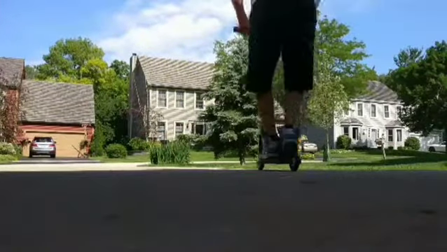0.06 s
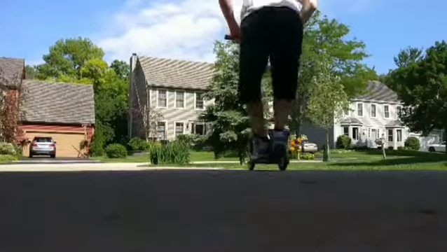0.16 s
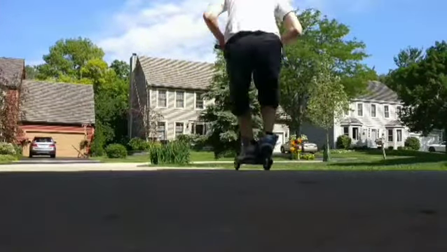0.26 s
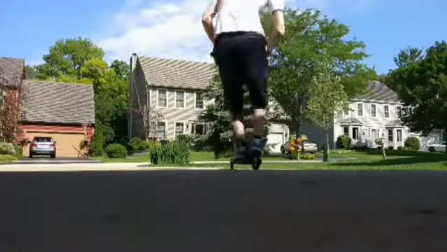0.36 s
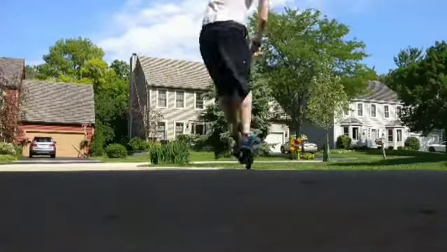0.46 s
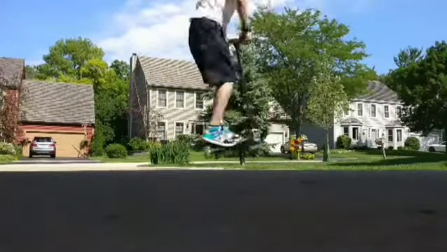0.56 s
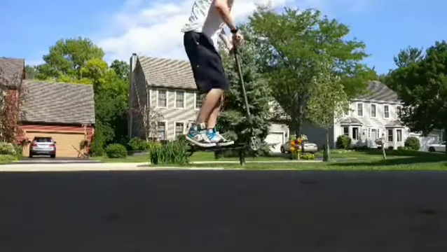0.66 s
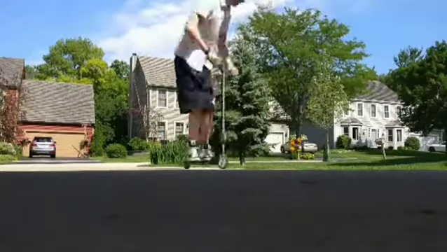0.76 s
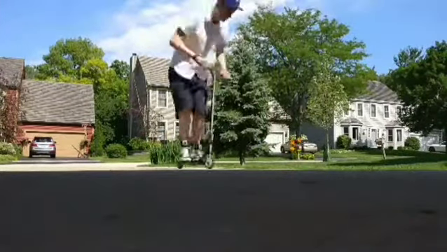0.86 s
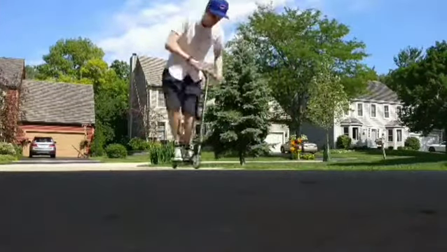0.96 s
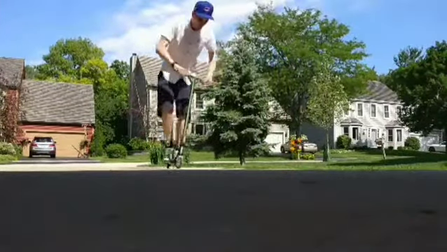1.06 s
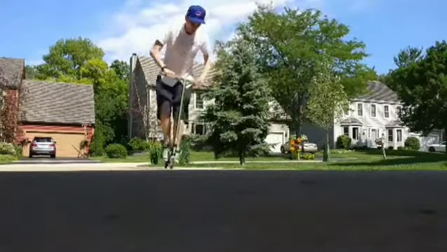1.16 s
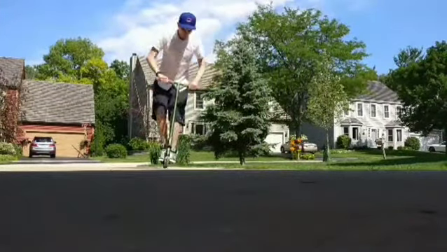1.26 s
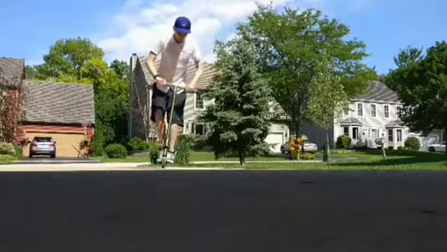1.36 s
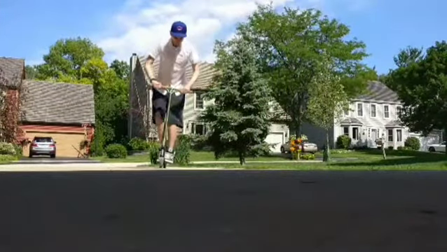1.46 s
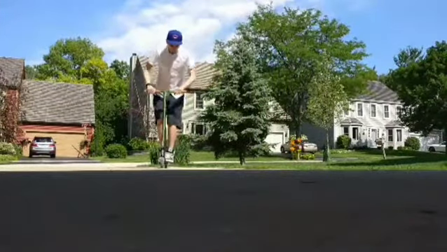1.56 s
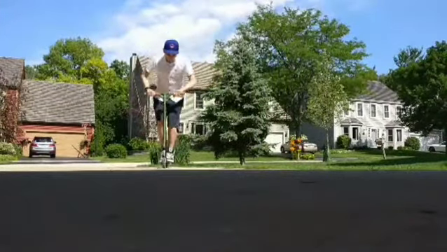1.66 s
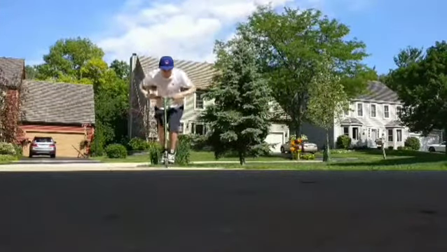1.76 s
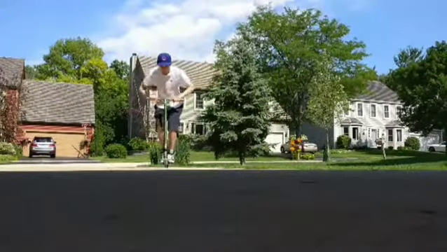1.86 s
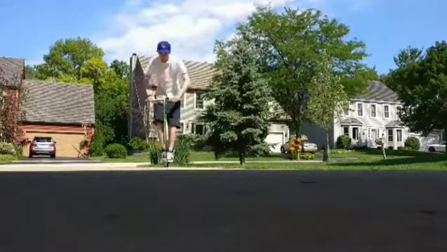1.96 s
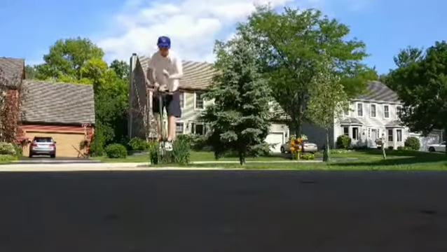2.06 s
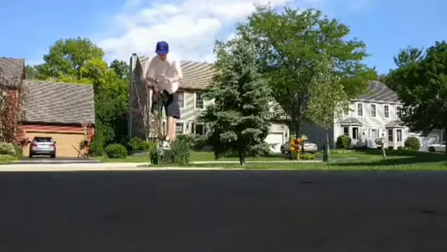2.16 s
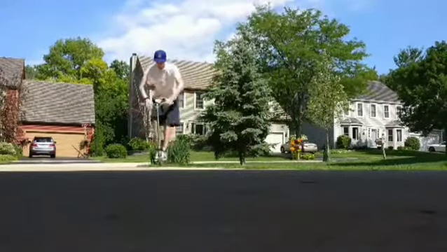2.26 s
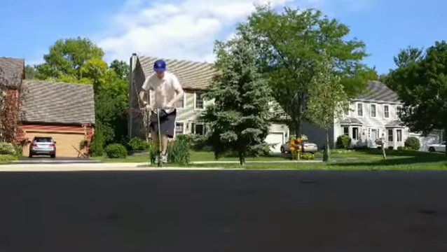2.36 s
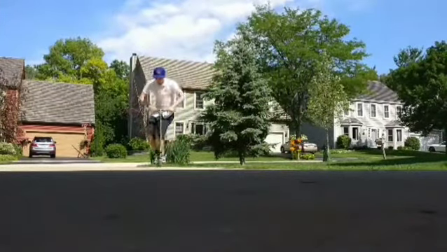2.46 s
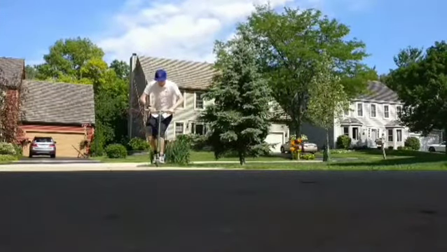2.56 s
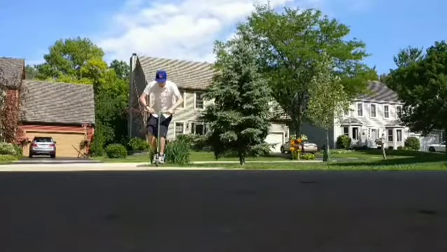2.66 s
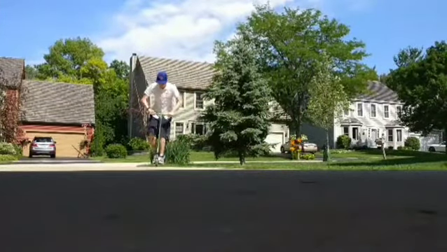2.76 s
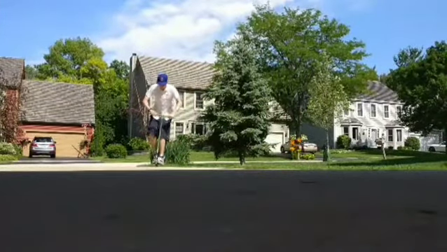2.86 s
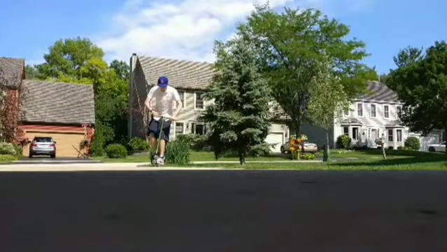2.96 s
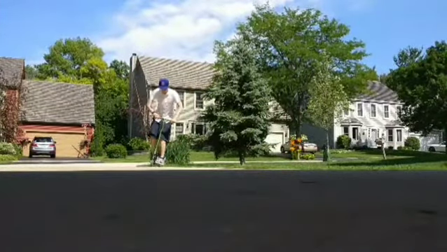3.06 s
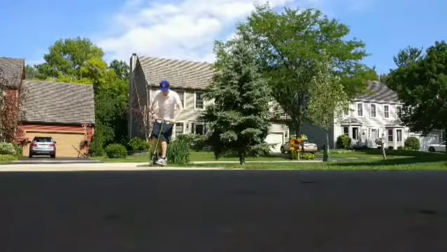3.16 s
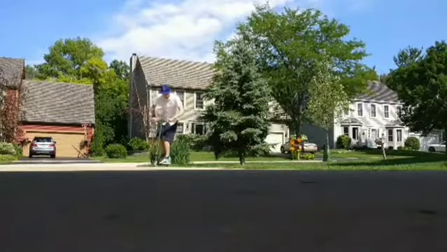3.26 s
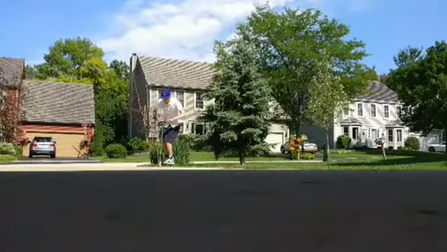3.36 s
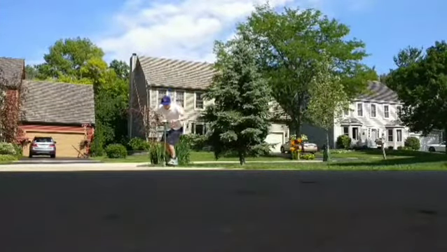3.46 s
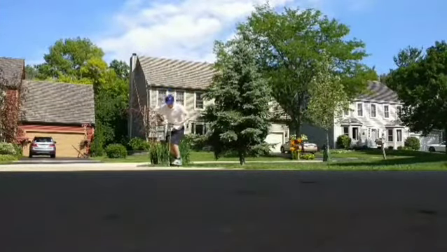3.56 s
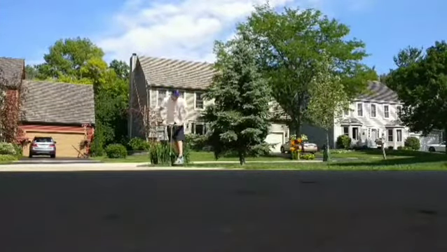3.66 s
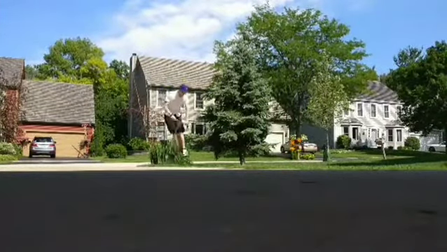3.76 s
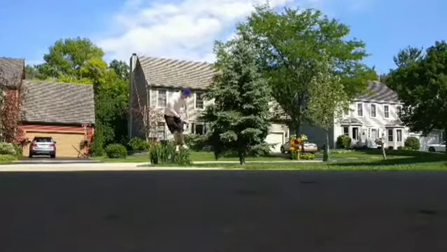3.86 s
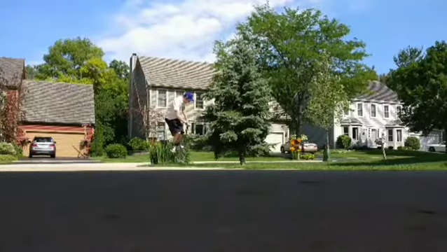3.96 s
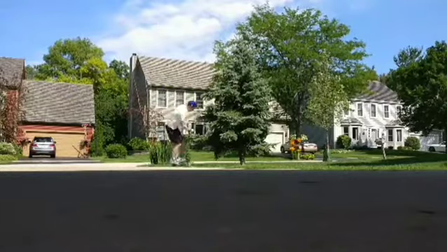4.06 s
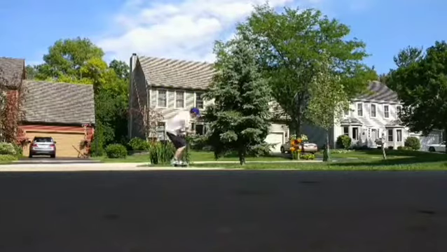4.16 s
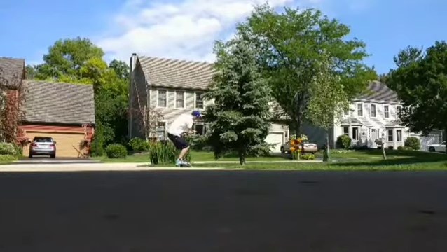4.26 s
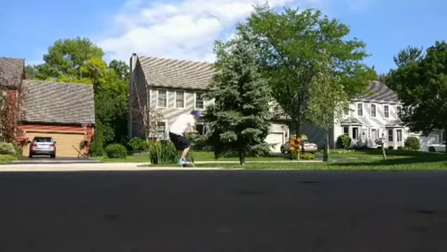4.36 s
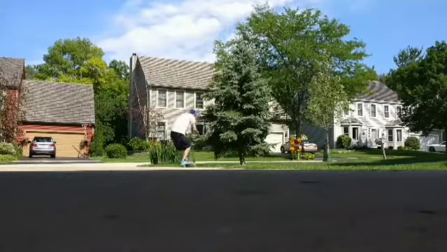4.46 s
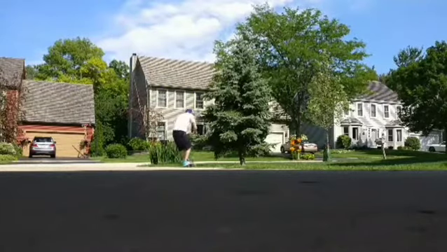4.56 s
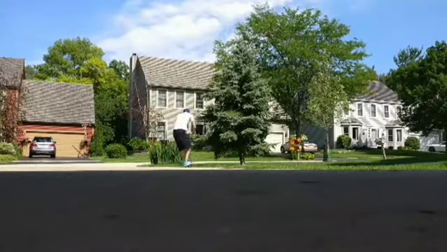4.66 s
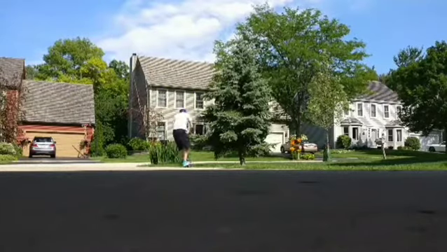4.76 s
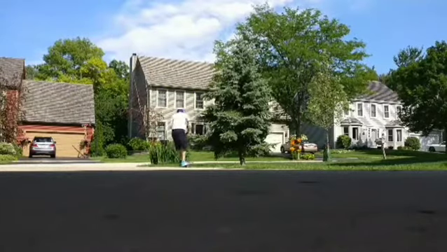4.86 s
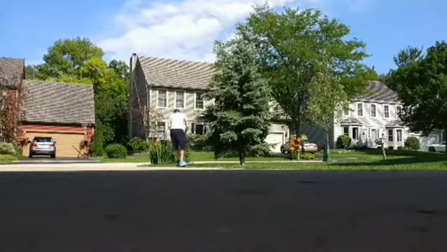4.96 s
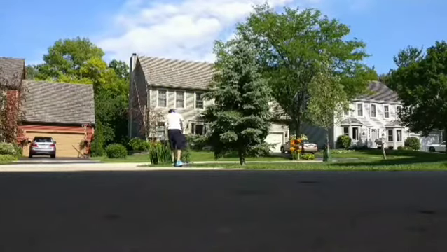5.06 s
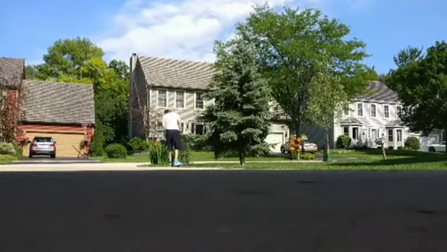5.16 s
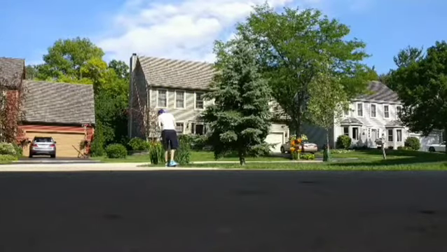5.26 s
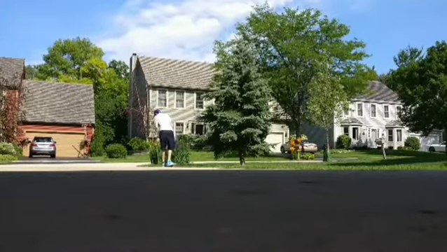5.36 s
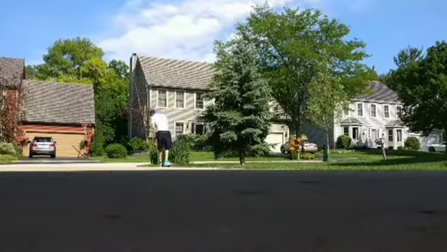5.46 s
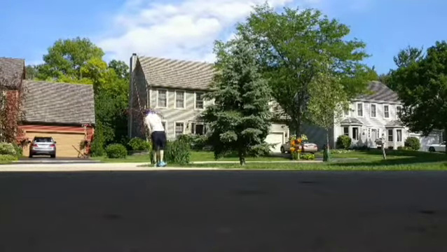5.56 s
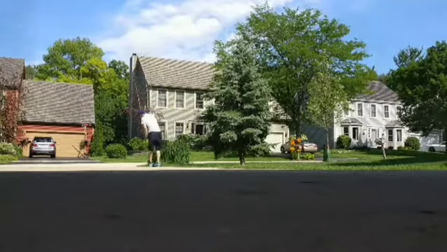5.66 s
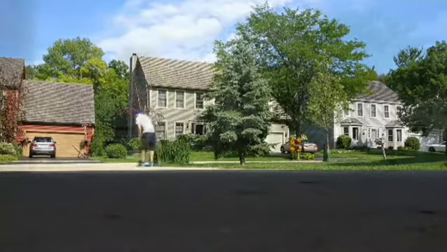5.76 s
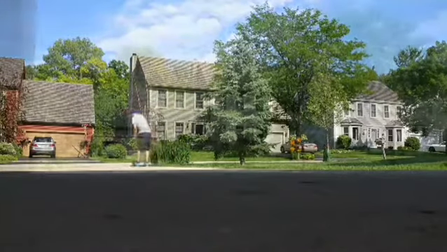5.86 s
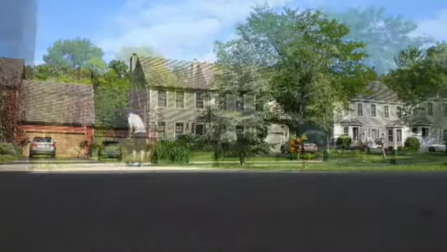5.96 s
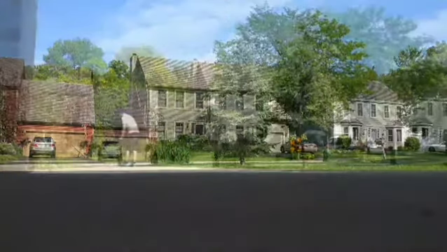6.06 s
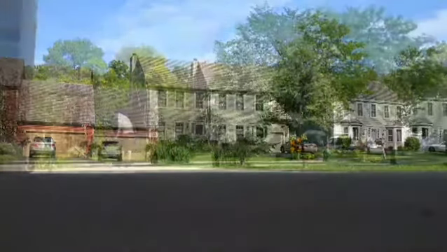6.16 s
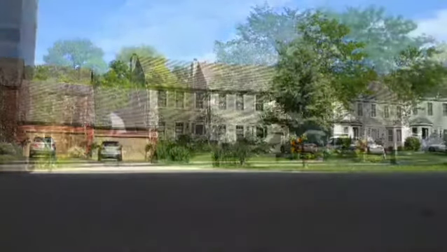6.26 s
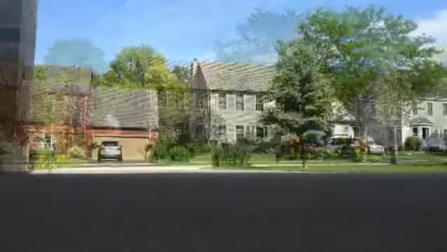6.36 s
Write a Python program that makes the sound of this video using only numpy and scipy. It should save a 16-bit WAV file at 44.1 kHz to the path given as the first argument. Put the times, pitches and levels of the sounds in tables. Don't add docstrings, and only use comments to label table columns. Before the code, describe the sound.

On a quiet residential street, a scooter wheel scrubs and squeals briefly, then the metal deck slams onto asphalt with a ringing, rattling clack. Small clamp knocks and shoe brushes follow, then two more landings, each echoing off house fronts. Distant traffic rumbles low beneath faint bird chirps. Everything fades out, then a closer landing cracks in abruptly. Outdoor stereo pickup, fixed near the ground.

```python
import sys
import numpy as np
from scipy import signal
from scipy.fft import rfft, irfft
from scipy.io import wavfile
from scipy.ndimage import uniform_filter1d

SR = 44100
rng = np.random.default_rng(int(sys.argv[2]) if len(sys.argv) > 2 else 0)


def master(y):
    cut = np.clip(np.atleast_2d(y).T, -1, 1)
    pcm = np.round(cut * 32767)
    wavfile.write(sys.argv[1], SR, pcm.astype(np.int16))


def attenuation_scalar(level_db):
    decades = np.asarray(level_db, float) / 20
    return 10 ** decades


N = 282681

# start_s, level_db
TRAFFIC_SWELL = [(0.0, 1), (0.3, 1), (0.6, -0.5), (1.0, -0.5), (1.45, -1.5), (1.95, -0.2), (2.2, -1.5),
                 (2.55, 0.5), (3.0, -0.5), (3.6, 1.1), (4.05, 1.1), (4.4, 4), (5.3, 2.06), (6.13, 1.5),
                 (6.41, 7.5)]
# freq_hz, level_db (per Hz)
RUMBLE_COLOUR = [(12, -70.5), (20, -36), (29, -7.5), (45, -6.5), (97, 2), (177, -7.5), (248, -11.5),
                 (312, -13.5), (403, -31.5), (500, -28.5), (650, -51.5), (1100, -120)]
# freq_hz, level_db (per Hz)
ROLL_COLOUR = [(210, -31), (350, -7), (409, -10.5), (442, -0.5), (528, -5), (667, 2), (942, -4.5),
               (1520, -1.5), (3910, -16), (5000, -23.5), (6500, -44.5), (11000, -120)]
# freq_hz, level_db (per Hz)
GRIT_COLOUR = [(2350, -19), (4000, -5.5), (4640, -6.5), (5410, -5), (7630, -13.5), (10400, -13),
               (11800, -7), (14700, -8.5), (15700, -13.5), (16200, -40.5), (16500, -60)]
# freq_hz, likeness (-1 to 1)
STEREO_LIKENESS = [(60, 1), (130, 0.91), (290, 0.98), (640, 0.22), (1410, -0.096), (3100, 0.093),
                   (6820, -0.19), (15000, -0.15)]
# start_s, length_s, start_hz, end_hz, level_db
BIRD_CALLS = [(1.636, 0.044, 3600, 4050, -58), (1.785, 0.31, 4150, 4330, -63),
              (2.012, 0.029, 12400, 12600, -60), (2.04, 0.032, 12360, 12150, -53),
              (2.063, 0.02, 13500, 13500, -57), (2.917, 0.046, 4220, 3060, -58),
              (3.032, 0.053, 3800, 3720, -56), (3.057, 0.038, 3400, 2493, -56.5),
              (3.151, 0.048, 4200, 3010, -56), (5.416, 0.034, 3930, 2740, -58),
              (5.83, 0.059, 4330, 4250, -55.5), (5.959, 0.068, 4300, 4320, -51)]
# start_s, length_s, level_db, top_hz
BRUSHES = [
    (0.341, 0.11, -42, 5650),
    (1.867, 0.3, -55, 6600),
    (2.544, 0.061, -40.5, 6370),
    (3.577, 0.26, -64, 9000),
]
# start_s, pressure_db
PIVOT_PRESSURE = [(0.0, -53.5), (0.088, -57), (0.226, -40.5), (0.292, -41), (0.345, -49.5), (0.396, -44),
                  (0.43, -54), (0.484, -50.5), (0.66, -52.5)]
# freq_hz, width_hz, level_db, follow_db (per dB of pressure)
WHEEL_MODES = [(638, 16, 3.5, 0.6), (1270, 34, -5, 0.5), (2050, 37, -3, 1.2), (2320, 27, -15, 1.1),
               (2530, 45, 0.5, 2), (2628, 26, -4, 0.4), (3225, 44, -3.5, 1.2), (3600, 56, -16, 1.1)]
# start_s, level_db, pitch_hz, t60_s
WEIGHT_DROPS = [(0.197, -18, 85.6, 0.13), (0.235, -20.5, 51.6, 0.094), (0.6715, -13, 96.6, 0.18),
                (.671, -23, 346, 0.096), (0.719, -21, 193, 0.085), (.734, -21, 200, 0.12),
                (1.103, -25.5, 76, 0.13), (2.236, -25, 96, 0.068), (2.24, -28, 327.4, 0.14),
                (2.273, -25.5, 71.4, 0.16), (3.991, -21, 289, 0.1), (6.231, -11.5, 75, 0.36)]
# start_s, level_db, pitch_hz, hiss_db (relative), t60_s
CLAMP_KNOCKS = [(0.312, -22.5, 2133, -37, 0.07), (0.311, -34.5, 1450, -32, 0.054),
                (0.347, -27.5, 1390, -17, 0.075), (1.4803, -35.5, 1310, -21, 0.071),
                (1.8844, -39, 1140, -18, 0.047), (2.0394, -52.5, 1130, -12, 0.043),
                (2.432, -30, 1390, -19.5, 0.26), (0.961, -33.5, 1950, -28, 0.1),
                (2.55, -29.5, 2290, -17.5, 0.12), (2.565, -26, 2250, -21, 0.094),
                (2.598, -35, 3400, -12.5, 0.072), (2.759, -26, 1340, -27.5, 0.047),
                (2.906, -36.5, 1340, -24, 0.12), (3.6124, -39.5, 1960, -20.5, 0.26),
                (4.523, -36.5, 1950, -24, 0.12), (5.06, -43, 1180, -22, 0.053)]
# freq_hz, level_db (per Hz)
SAND_COLOUR = [(1500, -26), (3000, 1), (5000, -2), (6500, -4), (8000, -20.5), (11000, -18), (13500, -11.5),
               (16000, -29.5)]
# start_s, level_db, pitch_hz, pan_db (left minus right)
METAL_TICKS = [(0.6686, -24.5, 11260, -8.5), (1.878, -60, 8800, -2), (1.937, -53, 7500, -6),
               (2.044, -52, 7500, -4), (2.154, -27, 6500, 2), (2.2331, -20, 7000, -2.5),
               (2.2453, -15, 6910, -5.5), (2.55, -50, 5100, 0), (3.994, -24, 12500, -11),
               (6.2312, -9.5, 9100, -10)]
# freq_hz, width_hz, level_db
DECK_MODES = [
    [(635, 32, -10), (780, 35, 1.5), (886, 65, -14), (1200, 47, -7), (1500, 52, -4.5), (1900, 41, -4.5),
     (1974, 35, -1), (2160, 60, -12), (2482, 57, -5), (2595, 70, -12.5), (3170, 96, -16), (4250, 60, -18),
     (4950, 140, -18)],
    [(840, 75, -10.5), (1190, 130, -7.5), (1500, 120, -9), (1960, 26.6, 1), (2232, 34, -10.5),
     (2370, 45, -16), (2493, 50, -11.5), (3200, 400, -31), (4250, 90, -16.5), (5650, 200, -19.5)],
    [(623, 25, -0.5), (776, 57, -7), (853, 46, -7.5), (1170, 28, -5.5), (1490, 60, -7.5), (1874, 50, -5.5),
     (1984, 76, -1), (2248, 45, -0.5), (2400, 30, -13), (2700, 50, -5.5), (3010, 69, -19), (4160, 74, -20)],
    [(620, 34, -10), (877, 30, -0.5), (1140, 45, -10.5), (1450, 60, 3), (1927, 40, 0.5), (2145, 59, 1.5),
     (2380, 42, -1.5), (2500, 53, -9), (3000, 130, -11.5), (4950, 200, -11.5)],
]
# freq_hz, level_db (per Hz)
CRACK_COLOUR = [(1500, -32.5), (3000, -1.5), (4500, 0.5), (6300, -0.5), (8000, -10), (10000, -8),
                (13500, -4), (15500, -13.5), (16500, -22.5)]
# freq_hz, level_db (per Hz)
CLATTER_COLOUR = [(150, -5.5), (300, 7), (500, -4.5), (800, -3), (1400, -0.5), (2150, -2), (3000, -7.5),
                  (4000, -13), (6000, -46)]
# rumble_db, roll_db, grit_db
LANDING_SETTINGS = [
    (-18, 0.031, 2, 2.1, 6),
    (-18.5, 0.048, 9.2, 16, 0.84),
    (-18, 0.05, 3.5, 2.9, 18),
    (-24, 0.024, 3, 11.5, 25),
]
# start_s, ring_db, crack_db (relative), pan_db (left minus right),
# favoured_hz
FIRST_BLOWS = [(.6695, -2.5, -16.5, 2, 2450), (.6745, -14.5, -20.5, 0, 2100), (.681, -5, -17, 3.5, 2000),
               (.687, -14, -10.5, -6, 1900), (.705, -24.5, -8, -6.5, 2300), (.72, -30, -8, -1, 2500),
               (.73, -32, -13, 0, 2000), (.741, -29, -11, 0, 4900), (.755, -38, -20, -1, 2450),
               (.795, -45, -29, -3, 1500), (.885, -38, -20, 8, 4250), (.886, -39, -20, 0, 1450)]
SECOND_BLOWS = [(2.1526, -21.5, -12, -3.5, 2000), (2.158, -19, -20, -8.5, 1960),
                (2.166, -14.5, -24, 3.5, 1960), (2.178, -16.5, -13, -0.5, 5750),
                (2.19, -13.5, -17.5, 0, 1900), (2.212, -22, -6.5, 8, 5600), (2.2332, -6, -15.5, -2, 2320),
                (2.237, -18.5, -15.5, -1, 1500), (2.2455, -16.5, -8.5, -3.5, 2034),
                (2.2575, -14.5, -14.5, 6.5, 2200), (2.272, -26.5, -11, -0.5, 4250),
                (2.29, -22.5, -22.5, 6.5, 2440), (2.31, -28.5, -18, -7.5, 2500)]
THIRD_BLOWS = [(3.9768, -15.5, -30, 0.5, 1900), (3.9845, -18, -28, -0.5, 1900),
               (3.992, -7, -13, -0.5, 1890), (4.0154, -21.5, -7.5, -4, 2300), (4.04, -20.5, -11, -4, 2050),
               (4.0625, -19, -10.5, 4, 1490), (4.09, -25.5, -12, 2.5, 2170),
               (4.116, -28.5, -16.5, -4, 2280), (4.146, -31, -14, 0, 2250), (4.168, -32, -7, 5, 860)]
FOURTH_BLOWS = [(6.162, -32.5, -3, 5, 2080), (6.169, -28, -16, 4, 2050), (6.174, -20.5, -8.5, 2, 2020),
                (6.175, -14.5, -23, 3, 4950), (6.188, -40, -21, -2, 2050), (6.212, -31, -10, -8, 2200),
                (6.2163, -25, -23, -9, 2050), (6.2325, -4.5, -8.5, 8.5, 1450),
                (6.239, -5.5, -11.5, -3.5, 1900), (6.29, -24, -20, -2, 2150), (6.352, -28, -16, 2, 2150),
                (6.378, -37, -14, -5, 2210)]
# freq_hz, t60_s
HOUSE_DECAY = [(150, 0.46), (700, 0.56), (2000, 0.53), (5000, 0.59), (13000, 0.323)]
# freq_hz, balance_db (left minus right)
PORT_BALANCE = [(60, -2.5), (110, -3), (200, 0.5), (380, -0.5), (700, -1.5), (1290, 1.5), (2380, -1.5),
                (4400, 2.5), (8120, -1), (15000, -10.5)]

LANDING_BLOWS = (FIRST_BLOWS, SECOND_BLOWS, THIRD_BLOWS, FOURTH_BLOWS)
RUMBLE_DB, ROLL_DB, GRIT_DB = -40, -52.5, -67.5
RUMBLE_FOLLOWS, ROLL_FOLLOWS, GRIT_FOLLOWS = 0.94, 1.09, 0.24
SETTLE_PEAK_S = 0.11
SCRUB_HISS_DB, SCRUB_SLOPE = -54, 1.1
LIGHT_RATTLE = 0.06
STRUCK_WIDTH_HZ, ELSEWHERE_DB = 930, -6
WOBBLE_HZ = 26
FADE_FROM_S, FADE_BEND, SINK_DB_PER_S = 5.19, 0.92, -39
CUT_S, OPEN_S = 6.1265, 0.003
EDGE_HZ, LAST_HZ = 15450, 16600


def evened(x):
    return x / np.sqrt(np.mean(x ** 2) + 1e-20)


def read(points, hz):
    f, value = np.transpose(points)
    return np.interp(np.log(hz + 1), np.log(f + 1), value)


def curve(rows, col):
    rows = np.asarray(rows)
    return np.interp(np.arange(N) / SR, rows[:, 0], rows[:, col])


def add(mix, s, sound):
    part = mix[:, round(s * SR):][:, :sound.shape[-1]]
    part += sound[..., :part.shape[1]]


def panned(db):
    return attenuation_scalar([[db / 2], [-db / 2]])


def ring(x, hz, width):
    pole = np.exp((2j * np.pi * hz - np.pi * abs(width)) / SR)
    return signal.lfilter([1], [1, -pole], x)


def hiss(shape, patchy_db, flicker_db):
    frames, hz = N // 256 + 5, np.fft.rfftfreq(1024, 1 / SR)
    a, b, c, d, patches = rng.standard_normal((frames, 513, 5)).T
    patches = uniform_filter1d(patches, size=10, axis=0)
    patches = evened(uniform_filter1d(patches, size=12, axis=1))
    flicker = evened(uniform_filter1d(rng.standard_normal(frames), size=6))
    same = np.clip(read(STEREO_LIKENESS, hz), -1, 1)[:, None]
    left = a + 1j * b
    right = same * left + np.sqrt(1 - same ** 2) * (c + 1j * d)
    level_db = read(shape, hz)[:, None] + patchy_db * patches + flicker_db * flicker
    z = np.array([left, right]) * attenuation_scalar(level_db)
    return evened(signal.istft(z, nperseg=1024, noverlap=768)[1][:, :N])


def colour(x, shape):
    hz = np.linspace(0, SR / 2, 129)
    taps = signal.minimum_phase(signal.firwin2(255, hz, attenuation_scalar(2 * read(shape, hz)), fs=SR))
    return signal.oaconvolve(x, taps[None] / np.linalg.norm(taps), axes=1)[:, :N]


def street():
    swell_db, settle_db = curve(TRAFFIC_SWELL, col=1), np.zeros((3, N))
    for blows, settings in zip(LANDING_BLOWS, LANDING_SETTINGS):
        u = np.maximum(np.arange(N) / SR - blows[0][0], 0) / SETTLE_PEAK_S
        settle_db += np.outer(settings[2:], u ** 2 * np.exp(1 - u ** 2))
    rumble_db = RUMBLE_DB + RUMBLE_FOLLOWS * swell_db + settle_db[0]
    roll_db = ROLL_DB + ROLL_FOLLOWS * swell_db + settle_db[1]
    grit_db = GRIT_DB + GRIT_FOLLOWS * swell_db + settle_db[2]
    rumble = attenuation_scalar(rumble_db) * hiss(RUMBLE_COLOUR, patchy_db=1.0, flicker_db=1.3)
    roll = attenuation_scalar(roll_db) * hiss(ROLL_COLOUR, patchy_db=1.44, flicker_db=0.7)
    grit = attenuation_scalar(grit_db) * hiss(GRIT_COLOUR, patchy_db=1.5, flicker_db=1.15)
    return rumble + roll + grit


def birds():
    out = np.zeros((2, N))
    for s, length, start_hz, end_hz, db in BIRD_CALLS:
        hz = np.linspace(start_hz, end_hz, round(length * SR))
        blur = evened(uniform_filter1d(rng.standard_normal((2, len(hz))), size=500))
        whistle = np.sin(2 * np.pi * np.cumsum(hz) / SR)
        add(out, s, attenuation_scalar(db) * np.hanning(len(hz)) * blur * whistle)
    return out


def houses(x):
    taps = np.zeros((2, SR))
    at = np.arange(400, SR - 20, 20) + rng.integers(0, 20, (2, (SR - 401) // 20))
    np.put_along_axis(taps, at, rng.choice([-1., 1.], at.shape), 1)
    hz, t, z = signal.stft(taps, SR, nperseg=256)
    decay = attenuation_scalar(-60 * t / read(HOUSE_DECAY, hz)[:, None])
    tail = signal.istft(z * decay, SR, nperseg=256)[1]
    return signal.fftconvolve(x, tail / np.linalg.norm(tail[0]), axes=1)[:, :N]


def scuffs():
    out = np.zeros((2, N))
    for s, length, db, top_hz in BRUSHES:
        u = np.linspace(0, 1, round(length * SR))
        band = signal.butter(3, [900, top_hz], "band", fs=SR, output="sos")
        brush = signal.sosfilt(band, rng.standard_normal((2, len(u))))
        add(out, s, attenuation_scalar(db) * brush * np.minimum(u / 0.074, 1) * (1 - u ** 2))
    return out


def pivot():
    slips = attenuation_scalar(3 * evened(uniform_filter1d(rng.standard_normal(N), size=250)))
    noise = evened(slips * (rng.standard_normal(N) + 0.54 * rng.standard_normal((2, N))))
    t, pressure_db = np.arange(N) / SR, curve(PIVOT_PRESSURE, col=1)
    push_db = pressure_db + 42
    squeal = np.zeros((2, N))
    for hz, width, db, follows in WHEEL_MODES:
        squeal += attenuation_scalar(db + follows * push_db - 95.5) * width * ring(noise, hz, 1.4 * width).imag
    band = signal.butter(6, [1200, 3850], "band", fs=SR, output="sos")
    scrape = attenuation_scalar(pressure_db - 8) * evened(signal.sosfilt(band, noise))
    down = np.clip((0.345 - t) / 0.012, 0, 1)
    scrub = attenuation_scalar(SCRUB_HISS_DB + SCRUB_SLOPE * push_db) * hiss(GRIT_COLOUR, patchy_db=2.0, flicker_db=2.5)
    return down * (squeal + scrape) + (t < PIVOT_PRESSURE[-1][0]) * scrub


def thumps():
    out, t = np.zeros((2, N)), np.arange(SR // 2) / SR
    for s, db, hz, t60 in WEIGHT_DROPS:
        swing = np.sin(2 * np.pi * hz * t) * (1 - np.exp(-t / 0.00021))
        add(out, s, attenuation_scalar(db - 60 * t / t60) * swing)
    return out


def ticks():
    out, t = np.zeros((2, N)), np.arange(88) / SR
    shape = t / 0.00025 * np.exp(1 - t / 0.00025)
    for s, db, hz, pan_db in METAL_TICKS:
        cycles = np.sin(2 * np.pi * hz * t) + 0.9 * rng.standard_normal((2, len(t)))
        add(out, s, attenuation_scalar(db) * panned(pan_db) * cycles * shape)
    return out


def rattle(t60, rise_s=0.0013):
    t = np.arange(SR // 4) / SR
    size = attenuation_scalar(3 * rng.standard_normal(len(t) // 20 + 1)).repeat(20)[:len(t)]
    decay = attenuation_scalar(-60 * t / np.clip(t60, 0.005, 0.4))
    return size * rng.standard_normal((2, len(t))) * decay * np.minimum(t / rise_s, 1)


def knocks():
    out, grit = np.zeros((2, 2, N))
    for s, db, hz, hiss_db, t60 in CLAMP_KNOCKS:
        shake = rattle(t60, rise_s=0.0034)
        push = shake + 5 * (np.arange(shake.shape[1]) == 0)
        dull = ring(ring(push, hz, 200), hz, 1000).imag / 4
        add(out, s, attenuation_scalar(db - 33.5) * dull)
        add(grit, s, attenuation_scalar(db + hiss_db) * shake)
    return out + colour(grit, SAND_COLOUR)


def aimed(x, hz):
    struck = 2 * np.pi * STRUCK_WIDTH_HZ / SR * ring(x, hz, STRUCK_WIDTH_HZ).real
    return attenuation_scalar(ELSEWHERE_DB) * x + struck


def wobble(length):
    drift = evened(uniform_filter1d(rng.standard_normal(length), size=350))
    return np.exp(2j * np.pi * np.cumsum(WOBBLE_HZ * drift) / SR)


def deck_mode(push, hz, width, db):
    out = np.zeros((2, SR // 2))
    for split, share, (start, turn) in zip((0, 1.1), (1, 0.45), rng.uniform(-np.pi, np.pi, (2, 2))):
        apart = min(hz / 1500, 0.8) * np.exp(1j * (np.pi / 2 + turn / 4)) * np.sign(start)
        heard = ring(push, hz + split * width * np.sign(turn), 0.9 * width)
        heard = heard * wobble(SR // 2) * np.exp(1j * start / 3) * np.array([[1 + apart], [1 - apart]])
        out += share * attenuation_scalar(db - 71.5) * width * heard.imag
    return out


def landings():
    rung, clatter, crack = np.zeros((3, 2, N))
    for blows, modes, (loose_db, hard_t60, *_) in zip(LANDING_BLOWS, DECK_MODES, LANDING_SETTINGS):
        touchdown = blows[0][0]
        chatter, strike = np.zeros((2, 2, SR // 2))
        for s, db, hiss_db, pan_db, struck_hz in blows:
            t60 = hard_t60 * (1.5 - LIGHT_RATTLE * db)
            shake, side = rattle(t60, rise_s=0.0024), panned(pan_db)
            shaken = aimed(shake[0] + 0.57 * shake, struck_hz)
            add(chatter, s - touchdown, attenuation_scalar(db + 0.16) * side * shaken)
            push = aimed(np.arange(400) == 0, struck_hz)
            add(strike, s - touchdown + 0.001007, attenuation_scalar(db + 23.5) * side * push)
            add(crack, s, attenuation_scalar(db + hiss_db - 2.5) * side * rattle(t60))
        add(clatter, touchdown, attenuation_scalar(loose_db) * chatter)
        for hz, width, db in modes:
            add(rung, touchdown, deck_mode(strike + chatter, hz, np.clip(width, 22, 300), db))
    return rung + colour(clatter, CLATTER_COLOUR) + colour(crack, CRACK_COLOUR)


def scene():
    clacks = landings() + knocks()
    echoes = attenuation_scalar(-10.0) * houses(clacks)
    scooter = clacks + echoes + ticks() + thumps() + pivot() + scuffs()
    return scooter + street() + birds()


def starved(x):
    hz, t, z = signal.stft(np.array([x[0] + x[1], x[0] - x[1]]) / 2, SR, nperseg=2048)
    power = (abs(z[:, :1024].reshape(2, 128, 8, -1)) ** 2).mean(axis=2)
    level = 10 * np.log10(uniform_filter1d(power, size=2, axis=2) + 1e-20)
    highs = 10 * np.log10(power[0, 20:].mean(axis=0) + 1e-20)
    calm = highs - np.roll(highs, 2) < 6
    short = (uniform_filter1d(level, size=5, axis=1) - level > 1.45) & calm
    z[:, :1024] *= attenuation_scalar(-28 * short.repeat(8, axis=1) * (hz[:1024, None] > 3600))
    mid, side = signal.istft(z, SR, nperseg=2048)[1][:, :N]
    return np.array([mid + side, mid - side])


def fade():
    t = np.arange(N) / SR
    left = np.clip((CUT_S - t) / (CUT_S - FADE_FROM_S), 0, 1)
    opened = np.clip((t - CUT_S) / OPEN_S, 0, 1)
    return left ** FADE_BEND + opened * attenuation_scalar(SINK_DB_PER_S * (t - CUT_S))


def top_cut(x):
    return signal.sosfilt(signal.butter(12, 16650, fs=SR, output="sos"), x)


def record(dry):
    hz = np.fft.rfftfreq(N + SR, 1 / SR)
    ports = attenuation_scalar(read(PORT_BALANCE, hz) * np.array([[0.5], [-0.5]]))
    bass_cut = 1 / np.sqrt(1 + (42 / (hz + 1)) ** 10)
    top = attenuation_scalar(np.interp(hz, [EDGE_HZ, EDGE_HZ + 250, LAST_HZ, LAST_HZ + 60], [0, -22, -30, -120]))
    heard = irfft(rfft(dry, N + SR) * ports * bass_cut * top, N + SR)[:, :N]
    heard = np.tanh(heard)
    return top_cut(starved(heard) * fade())


dry = scene()
out = record(dry)
master(out)
```